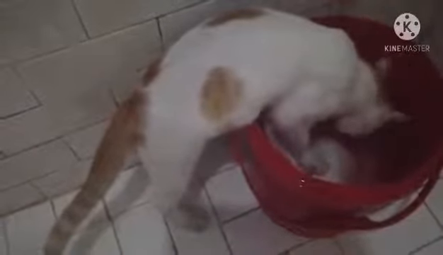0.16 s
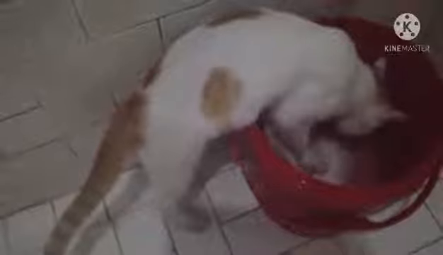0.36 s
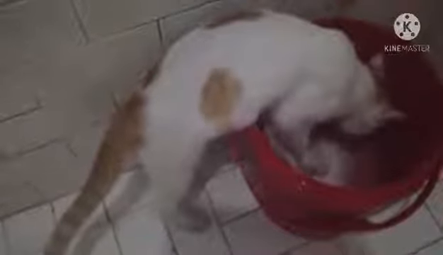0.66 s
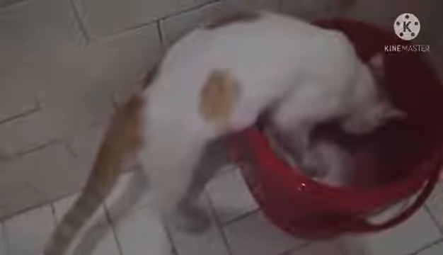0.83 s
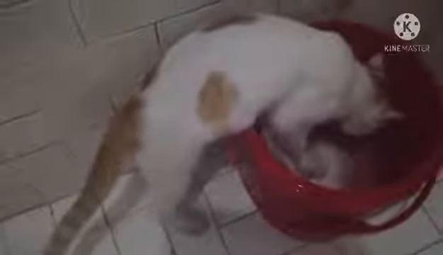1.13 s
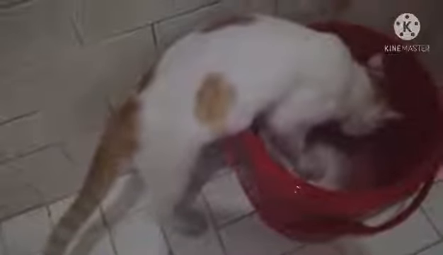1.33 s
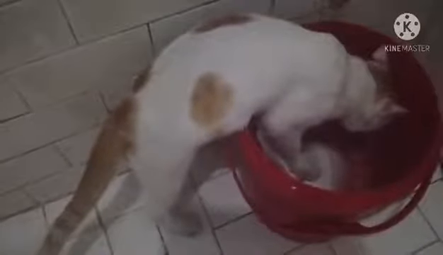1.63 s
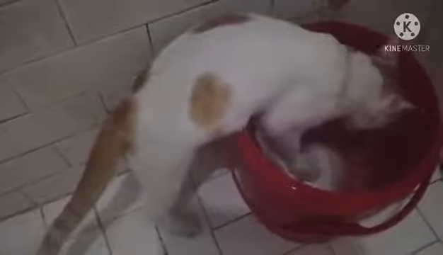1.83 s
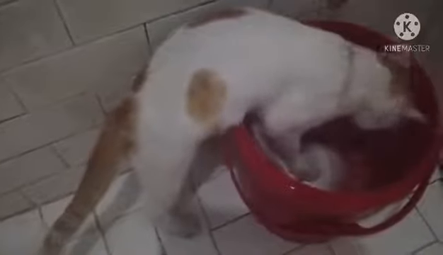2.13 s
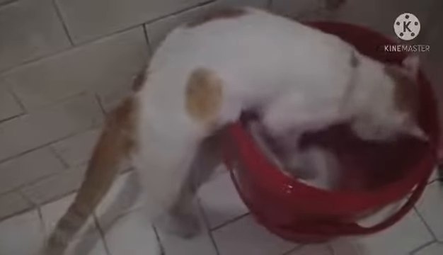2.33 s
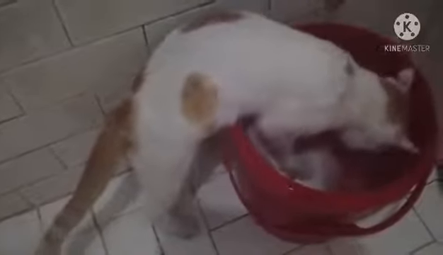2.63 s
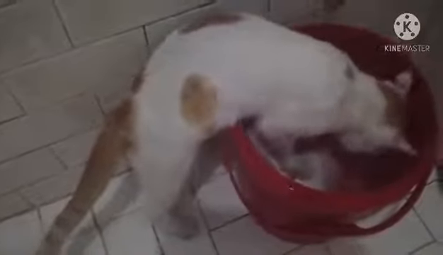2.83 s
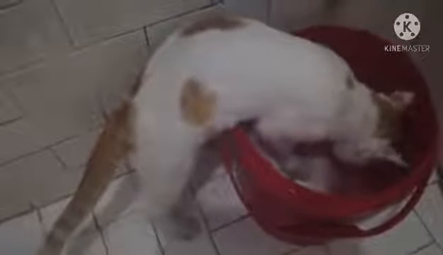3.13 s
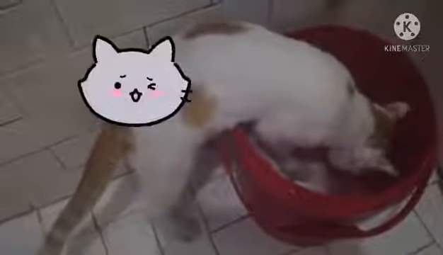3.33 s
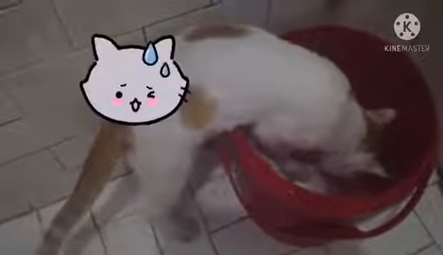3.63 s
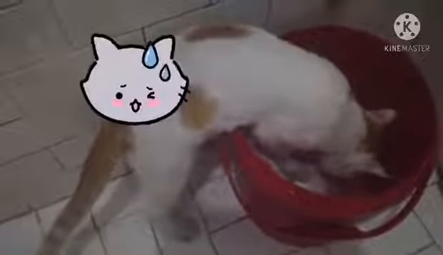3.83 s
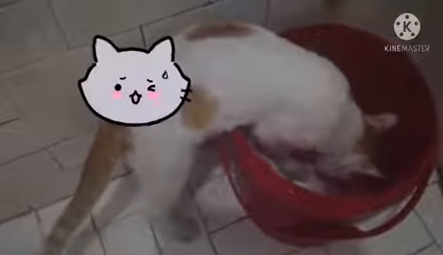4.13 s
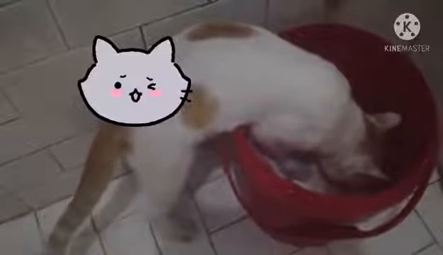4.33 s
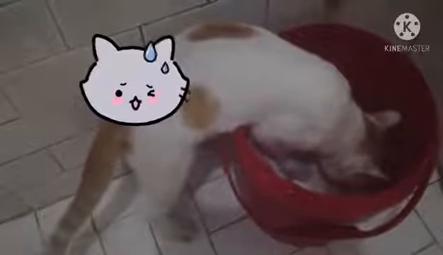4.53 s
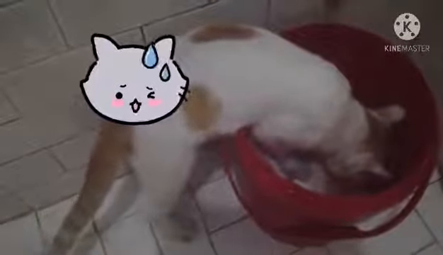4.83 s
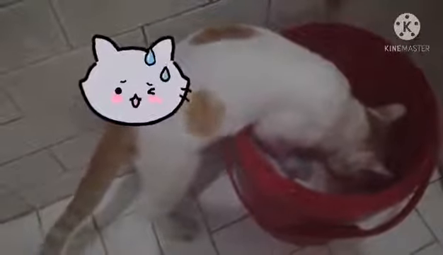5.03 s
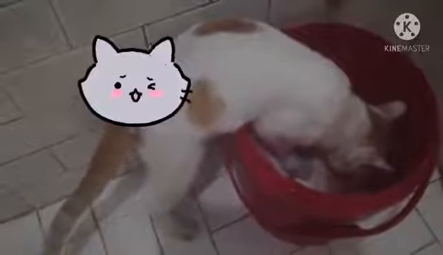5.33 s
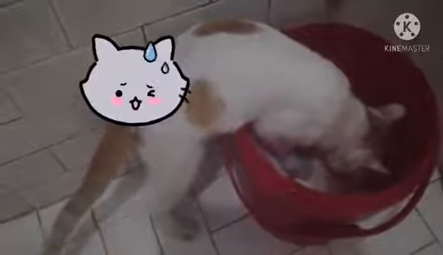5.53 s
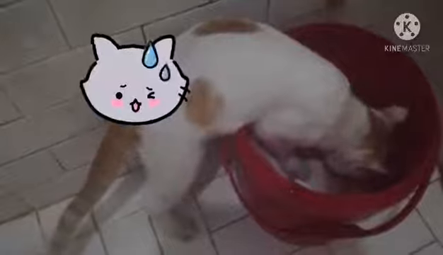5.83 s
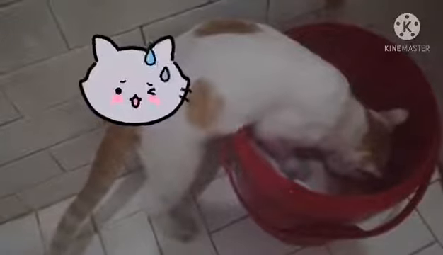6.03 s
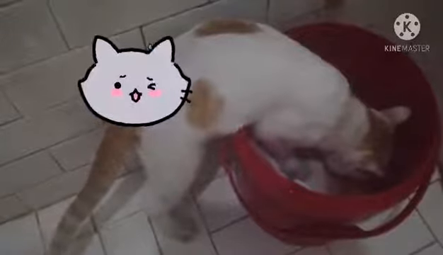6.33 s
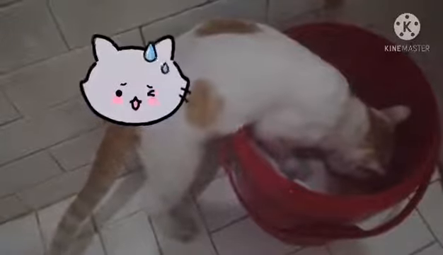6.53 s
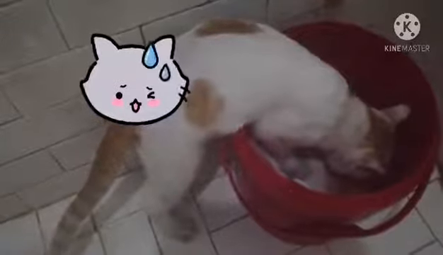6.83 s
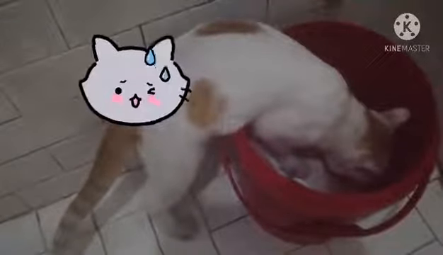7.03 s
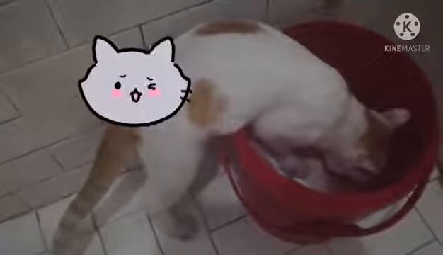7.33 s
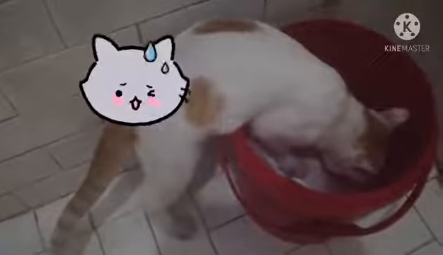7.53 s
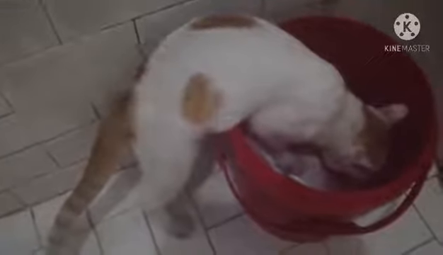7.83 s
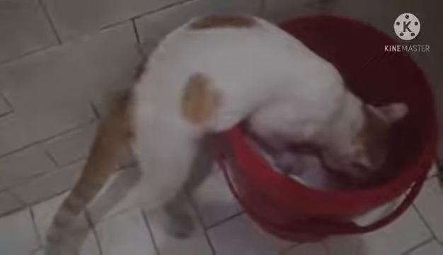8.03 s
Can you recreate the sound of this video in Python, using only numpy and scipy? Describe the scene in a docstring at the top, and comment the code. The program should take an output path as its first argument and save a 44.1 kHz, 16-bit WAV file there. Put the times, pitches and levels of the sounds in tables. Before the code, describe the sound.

Close, wet splashing and bubbling in a plastic bucket, heard twice around a quiet gap with faint distant taps, then near-silent room tone.

```python
"""Water slopping in a bucket

Water slops in a plastic bucket in a tiled room: one bout of wet splashes and bubbles, heard twice with a pause.
In each splash an air pocket plops and a water film snaps. Drops fall back, a wake fizzes and settles,
and bubbles chirp as they surface. Each sound is a short fading tone, a crowd of such tones, or shaped noise.
The very quiet room lies to the right: low rumble, hiss, very narrow bands of noise that slowly swell and fade,
and a few distant taps."""
import sys
import numpy as np
from scipy import signal
from scipy.fft import rfft, irfft, next_fast_len
from scipy.io import wavfile
from scipy.ndimage import uniform_filter1d

SR = 44100
rng = np.random.default_rng(int(sys.argv[2]) if len(sys.argv) > 2 else 0)


def store_pcm(level_fs):
    """Save levels as 16-bit WAV."""
    pcm = np.round(np.clip(level_fs, -1, 1) * 32767).astype(np.int16)
    wavfile.write(sys.argv[1], SR, np.atleast_2d(pcm).T)


N = 360013
TIME = np.arange(N) / SR

# Steady hiss and rumble of the room: [f/Hz, level/dB]
ROOM_SPECTRUM = [(12, -18), (22, 2), (59, -8), (94, -3.5), (115, -15), (158, -12), (195, -20.5), (330, -22),
                 (600, -22.5), (1000, -30), (3000, -37.5), (3900, -48), (5800, -33.5), (10000, -37),
                 (13000, -47.5)]
# Swells of the low rumble: [top t/s, half width/s, level/dB, f/Hz]
RUMBLE_SWELLS = [(2.52, 0.045, -54, 67.4), (2.585, 0.045, -52, 89.6), (2.8, 0.046, -46.5, 71.6),
                 (2.865, 0.043, -50, 87.4), (3.08, 0.066, -56, 96), (7.5, 0.23, -56.5, 89)]
# Very narrow bands of noise that slowly swell and fade: [start t/s, top t/s, end t/s, f/Hz, level at the top/dB]
NARROW_BANDS = [(5.9, 6.24, 6.75, 4140, -75), (6.55, 6.83, 7.35, 9900, -72), (7.36, 7.609, 8.05, 4170, -71)]
# Splashes and drips, each a plop and a snap: [t/s, plop level/dB, plop f/Hz, snap level/dB, snap f/Hz]
SPLASHES = [(3.750, -72, 2000, -44, 6100), (3.763, -57, 1080, -34, 5840), (3.796, -60, 1900, -41, 4440),
            (3.836, -35.5, 897, -43, 5240), (3.865, -38, 925, -25, 4780), (3.873, -34, 932, -26, 5140),
            (3.935, -50, 1080, -35, 3620), (3.96, -41.5, 2060, -37.5, 4700), (4.002, -65, 2100, -40, 8600),
            (4.019, -77, 1440, -46, 3330), (4.046, -29, 1020, -26, 3270), (4.052, -26, 940, -25.5, 6540),
            (4.081, -25.5, 867, -32, 2740), (4.092, -61, 837, -28, 5000), (4.131, -16, 951, -22.5, 4050),
            (4.141, -31, 1020, -29.5, 3450), (4.149, -32, 1055, -33, 3580), (4.157, -30.5, 845, -34, 3945),
            (4.166, -50, 1095, -26, 2760), (4.196, -34, 1000, -36, 4150), (4.245, -37, 956, -33, 7600),
            (4.263, -47, 1130, -38.5, 5485), (4.272, -34.5, 957, -45, 2580), (4.283, -32, 1015, -44, 2770),
            (4.298, -27.5, 1054, -33, 3540), (4.349, -33.5, 1254, -42.5, 4200),
            (4.359, -36.5, 952, -35, 4550), (4.4, -39, 1115, -47, 3500), (4.469, -34, 1000, -37, 3600),
            (4.494, -33, 1080, -28, 5130), (4.505, -29.5, 1095, -21.5, 3560),
            (4.525, -27.5, 944, -21, 4100), (4.568, -31.5, 1054, -96, 3660), (4.58, -31, 867, -72, 3060),
            (4.607, -32.5, 1217, -26.5, 4200), (4.622, -31, 1192, -32, 4070), (4.636, -30, 1158, -24, 4145),
            (4.647, -21.5, 1038, -22.5, 3806), (4.651, -23.5, 961, -23, 3683),
            (4.659, -22.5, 1081, -28.5, 2962), (4.669, -24.5, 1210, -34.5, 3263),
            (4.695, -22.5, 1058, -39, 3534), (4.705, -31, 991, -34.5, 3776),
            (4.726, -33.5, 1079, -28.5, 3576), (4.746, -36.5, 1238, -32.5, 7780),
            (4.789, -20.5, 1388, -17, 4200), (4.797, -21.5, 1237, -7, 5000),
            (4.803, -13.5, 1278, -24.5, 3057), (4.818, -22.5, 1200, -18.5, 4766),
            (4.827, -23, 1349, -29, 3020), (4.850, -24.5, 1270, -17.5, 4200),
            (4.860, -23.5, 1277, -26.5, 4660), (4.865, -24, 1214, -19, 4020), (4.877, -21, 1259, -46, 3164),
            (4.914, -24, 1253, -45, 4580), (4.967, -32, 1035, -21, 5300), (4.986, -34, 1380, -26.5, 5460),
            (4.990, -27, 1660, -28.5, 5250), (5.006, -12.5, 1327, -24, 5400), (5.008, -22, 1006, -15, 6420),
            (5.023, -27.5, 1230, -28.5, 5570), (5.032, -33, 1143, -26.5, 3580),
            (5.039, -29.5, 1390, -26.5, 4720), (5.069, -24.5, 1367, -26.5, 3572),
            (5.087, -42.5, 1458, -31.5, 3060), (5.099, -39, 1420, -36, 4670),
            (5.113, -19.5, 1395, -15, 3950), (5.126, -25, 1410, -16.5, 5575),
            (5.133, -22.5, 1195, -33, 3250), (5.162, -31.5, 1294, -31.5, 3044),
            (5.195, -32, 1227, -28.5, 5720), (5.232, -10, 1580, -13.5, 5795),
            (5.240, -13.5, 1510, -14.5, 5340), (5.250, -15, 1259, -21, 4430),
            (5.266, -25.5, 1289, -33.5, 3850), (5.279, -30, 969, -34.5, 3490),
            (5.293, -25, 1628, -19, 3570), (5.299, -20, 1560, -16.5, 3930), (5.311, -24, 1566, -19.5, 3620),
            (5.322, -19.5, 1372, -26, 3640), (5.352, -18.5, 1735, -21.5, 3520),
            (5.358, -19.5, 1435, -23.5, 5570), (5.382, -44, 1415, -27.5, 6050),
            (5.429, -21.5, 1370, -19.5, 7560), (5.439, -37.5, 1230, -28, 6540),
            (5.456, -27, 1375, -28, 3020), (5.474, -34.5, 1850, -30.5, 2900),
            (5.504, -27.5, 1570, -39, 2940), (5.515, -26.5, 1310, -32, 2860), (5.535, -38, 1430, -38, 3750),
            (5.556, -41, 890, -35, 2860), (5.568, -35, 1480, -37, 4900), (5.594, -31, 1390, -36.5, 3740),
            (5.612, -38.5, 1220, -38, 2950), (5.633, -36.5, 994, -40.5, 5400),
            (5.642, -41, 1510, -39.5, 3140), (5.666, -43, 1240, -41, 5670), (5.676, -34.5, 1320, -40, 3060),
            (5.683, -36, 2280, -39, 6900), (5.721, -54, 1380, -43.5, 5000), (5.743, -39.5, 1020, -41, 2880),
            (5.770, -51, 1460, -47, 3200), (5.804, -34, 1440, -32.5, 6760), (5.827, -46, 1110, -53, 7450),
            (5.835, -30, 1550, -32.5, 3040), (5.844, -34, 1480, -32, 6940), (5.863, -41.5, 1120, -31, 7500),
            (5.871, -28, 1660, -30.5, 6470), (5.898, -39.5, 1200, -39, 2960), (5.921, -40, 1280, -44, 6900),
            (5.944, -44, 1510, -48, 2950), (5.955, -31.5, 1283, -35, 2970), (5.956, -32.5, 1680, -46, 4220),
            (5.975, -49, 1367, -46, 3480), (5.992, -39.5, 1600, -48, 2980), (6.010, -44, 1236, -55, 2960),
            (6.022, -55, 1720, -52, 3760), (6.042, -56, 1530, -51, 3000), (6.076, -38.5, 1647, -30.5, 6700),
            (6.106, -49, 1520, -67, 3470), (6.113, -56.5, 1100, -51, 3300), (6.155, -50, 1570, -67, 5410),
            (6.166, -53, 1135, -70, 5000), (6.177, -49, 1650, -49.5, 8180), (6.182, -45.5, 1186, -75, 4570),
            (6.205, -83, 1150, -47.5, 8700), (6.218, -52, 1185, -58, 3140),
            (6.259, -46.5, 1555, -47.5, 7700), (6.317, -52, 1575, -57, 3410)]
# How much the water is stirred between splashes: [t/s, slosh level/dB, fizz level/dB]
STIRRING = [(3.74, -84, -66), (3.85, -55, -62.5), (4.0, -81, -89), (4.057, -35, -40.5), (4.23, -48.5, -60),
            (4.33, -40, -52), (4.44, -55.5, -58.5), (4.54, -48.5, -59), (4.64, -42, -45),
            (4.77, -52.5, -55.5), (4.83, -40, -56.5), (4.95, -46.5, -51), (5.03, -42.5, -50.5),
            (5.22, -45, -53.5), (5.27, -33, -53.5), (5.45, -41, -50), (5.58, -52, -57.5), (5.68, -44, -66),
            (5.78, -94, -77.5), (6.2, -71, -77.5), (6.42, -80.5, -82.5)]
# Larger pockets that gurgle low while the water is churned hardest: [t/s, level/dB]
GURGLING = [(4.7, -75), (4.8, -47), (4.93, -63), (5.02, -47), (5.2, -58), (5.3, -50.5), (5.45, -49),
            (5.6, -60), (5.75, -85)]
# Tone balance of the fine wet fizz: [f/Hz, level/dB]
FIZZ_SPECTRUM = [(1200, -26.5), (1900, -5), (2600, -8.5), (3300, -2), (4200, -4.5), (5500, 1.5),
                 (7500, 1.5), (10000, 3), (13000, -4.5)]
# Single ringing bubbles: [t/s, length/s, level/dB, first f/Hz, last f/Hz]
BUBBLES = [(3.862, 0.0113, -33, 2940, 4570), (3.934, 0.015, -39, 3480, 3730),
           (4.017, 0.031, -33.5, 3350, 3570), (4.05, .022, -35, 2200, 2550),
           (4.077, 0.0275, -29.5, 2650, 3040), (4.106, 0.018, -26.5, 1014, 1080),
           (4.155, 0.017, -34, 2600, 3650), (4.164, .025, -29, 1110, 1140), (4.195, .016, -36, 3870, 4100),
           (4.256, 0.025, -36, 1240, 1620), (4.285, 0.039, -35, 2655, 2650), (4.334, .024, -38, 1126, 1300),
           (4.366, 0.022, -40, 3870, 4200), (4.401, 0.016, -33, 1155, 1190),
           (4.502, 0.028, -38, 2800, 2940), (4.515, 0.015, -49, 2080, 2560),
           (4.644, 0.03, -29.5, 2306, 2200), (4.646, 0.022, -33, 5130, 5260),
           (4.644, 0.044, -29, 1032, 1100), (4.664, 0.014, -36, 2240, 2530),
           (4.376, 0.035, -40, 2720, 3070), (4.523, 0.019, -39, 3010, 4550), (4.618, .018, -33, 3730, 4130),
           (4.714, 0.022, -36.5, 2490, 4100), (4.755, .04, -42, 721, 669.6), (4.802, .024, -24, 645, 656),
           (4.8272, .04, -25, 646.6, 694), (4.849, 0.04, -25.5, 1333, 1285),
           (4.891, 0.077, -28, 1276, 1347), (4.877, 0.029, -22, 741, 750), (4.903, 0.096, -36.5, 792, 848),
           (4.93, 0.09, -41, 1460, 1610), (4.96, 0.033, -34, 1370, 1500), (4.9715, 0.033, -22, 592, 650),
           (4.988, 0.018, -28, 682, 1000), (5.014, 0.023, -26, 589, 503), (5.031, 0.092, -40, 503, 576),
           (5.037, .075, -26.5, 1418, 1407), (5.061, .04, -28, 1374, 1420), (5.097, 0.053, -43, 1390, 1642),
           (5.072, 0.025, -26, 690, 730), (5.104, 0.11, -38.5, 770, 913), (5.133, 0.06, -25.5, 553, 560),
           (5.135, 0.058, -24.5, 987, 1035), (5.155, 0.087, -41.5, 126.3, 142),
           (5.158, 0.024, -33, 1050, 1537), (5.169, .025, -29, 1599, 1693), (5.174, 0.019, -36, 1732, 3100),
           (5.194, .025, -36, 1670, 1728), (5.195, .03, -33.5, 1035, 1059), (5.25, .014, -27, 4310, 4400),
           (5.237, .014, -15, 5900, 4117), (5.256, 0.017, -27.5, 1180, 1520),
           (5.269, .014, -27, 3880, 3928), (5.293, 0.025, -23, 1559, 1634), (5.33, 0.025, -31, 1430, 1480),
           (5.326, .014, -40, 3620, 3960), (5.224, 0.12, -50.5, 553, 593), (5.243, 0.16, -27.5, 1013, 1045),
           (5.321, 0.05, -35, 738, 765), (5.322, 0.1, -40, 560, 667), (5.378, 0.096, -36.5, 700, 770),
           (5.362, 0.025, -26, 1990, 2060), (5.403, 0.018, -24, 1270, 1600),
           (5.419, 0.013, -29, 1660, 2600), (5.43, 0.03, -31, 820, 860), (5.44, .11, -39.5, 268, 314),
           (5.44, 0.024, -30.5, 2430, 2500), (5.444, 0.014, -29, 950, 1250),
           (5.454, 0.0135, -28.5, 1345, 1850), (5.471, 0.017, -32, 2250, 2320),
           (5.45, 0.067, -32.5, 641, 588), (5.505, 0.025, -30.5, 2760, 2970),
           (5.506, 0.025, -30.5, 1900, 1980), (5.524, 0.019, -33, 3020, 3300),
           (5.529, 0.145, -47.5, 590.6, 762), (5.605, 0.0298, -38, 1107, 1860),
           (5.631, 0.04, -31, 334, 270), (5.643, 0.09, -42, 300, 296), (5.68, 0.015, -41, 1560, 2200),
           (5.692, 0.045, -46.5, 2360, 2560), (5.743, 0.042, -39.5, 1007, 1040),
           (5.839, 0.038, -33, 1533, 1570), (5.863, 0.04, -41, 1547, 1570), (5.875, 0.032, -38, 1156, 1170),
           (5.896, 0.021, -33, 1620, 1640), (5.93, .02, -58, 1280, 1300), (5.952, 0.042, -35, 1233, 1280),
           (5.978, 0.025, -50, 1320, 1750), (6.009, 0.017, -42.5, 1970, 2040),
           (6.076, 0.035, -44.5, 1640, 1650), (6.218, 0.016, -51, 1980, 2020),
           (6.247, 0.022, -53, 1620, 1670)]
# Deep pulses of the water pushed aside: [t/s, length/s, level/dB, last f/Hz]
GULPS = [(3.611, 0.092, -44.5, 38), (3.761, 0.135, -44.5, 25.6), (3.964, 0.171, -40.5, 43),
         (4.325, 0.143, -39.5, 49.7), (4.481, .165, -38, 65.56), (4.672, 0.2, -38.5, 88.6),
         (4.955, .145, -35.5, 84.2)]
# Tones of the air in the bucket: [f/Hz, level/dB]
BUCKET_TONES = [(600, -8.5), (996, -4), (1240, -8.5), (1299, -10), (1440, -10.5), (1560, -6), (1744, -7),
                (1955, -9), (2750, -15), (3650, -15.5), (3900, -10.5)]
# Distant taps: [t/s, level/dB]
TAPS = [(2.454, -46.5), (2.661, -45), (2.824, -54.5), (2.917, -59)]
# Tone balance of the distant taps: [f/Hz, level/dB]
TAP_SPECTRUM = [(200, -20), (330, 4.5), (520, -4), (800, -8), (1200, -3.5), (1800, 0.5), (2400, -7),
                (3000, -9.5), (3800, -25), (7000, -30)]

REPEAT_S = 4.06349   # the bout is also heard this much earlier
CUTOFF_HZ = 13300
SIDE_DB = -6.5
SWELL_WIDTH_HZ = 19
BAND_FADE_DB = 21   # how far below its top each narrow band starts and ends
# ring times down to -60 dB, counted in cycles of the tone
PLOP_CYCLES, SNAP_CYCLES, SPRAY_CYCLES, CHIRP_CYCLES, PLIP_CYCLES = 36.5, 24, 36, 110, 42
# drops thrown up by a splash fall back: mean delay, level against the splash, loss with delay, pitch scatter
FALL_S, FALL_DB, FALL_DB_PER_S, FALL_OCTAVES = 0.02, -12, 91.5, 0.12
FALL_SNAP_DB = -16.5   # a falling drop's snap against that of the splash
FALL_GROWTH, BIG_SPLASH_DB = 0.29, -22   # small splashes throw less: dB lost per dB below a big one
CRACK_DB, CRACK_T60_S = -1, .003   # tick of a tearing film: level against its snap, time to fall 60 dB
# wake of small bubbles: start against the plop and the snap, and how fast it settles
WAKE_SLOSH_DB, WAKE_FIZZ_DB, WAKE_DB_PER_S = -23.0, -29.5, 200.5
PLIPS_PER_S, TRICKLE_PER_S, SPRAY_PER_S = 320, 700, 3200   # small bubbles born each second
SWARM_RISE, CHIRP_RISE = .035, .3   # upward glide as a share of the pitch
BUBBLE_FADE_DB, SURFACING_DB_PER_OCTAVE = 28.5, 30   # a bubble that glides up fades less
BUBBLE_WAVER = 0.0055   # random phase drift: radians per root second, per Hz of pitch
BUBBLE_FLUTTER_DB, BUBBLE_FLUTTER_S = 2, 0.0063   # shaking of level: depth at 1 kHz by the end, time scale
GULP_FIRST_HZ = 22.9
BUCKET_WIDTH_HZ = 22


def from_db(db):
    """Turn decibels into a plain multiplier."""
    return 10 ** (np.asarray(db) / 20)


def rms_one(x):
    """Scale a sound to an average strength (rms) of 1."""
    return x / np.sqrt(np.mean(x ** 2) + 1e-20)


def noise():
    """Plain random hiss for the whole scene."""
    return rng.standard_normal(N)


def in_time(rows):
    """Read each column of a curve table at every sample."""
    s, *columns = np.transpose(rows)
    return [np.interp(TIME, s, c) for c in columns]


def add(out, s, sound):
    """Mix a sound in at time s."""
    i = max(round(s * SR), 0)
    out[i:i + len(sound)] += sound[:N - i]


def band(x, low_hz, high_hz):
    """Keep only the pitches between two limits."""
    sections = signal.butter(2, [low_hz, min(high_hz, .45 * SR)], "band", fs=SR, output="sos")
    return signal.sosfilt(sections, x)


def coloured(x, spectrum):
    """Shape a sound by a spectrum, then set its rms to 1."""
    hz, db = np.transpose(spectrum)
    size = next_fast_len(N)
    bins = np.maximum(np.arange(size // 2 + 1) * SR / size, 1)
    gain = from_db(np.interp(np.log(bins), np.log(hz), db))
    return rms_one(irfft(rfft(x, size) * gain, size)[:N])


def room_tone():
    """Steady hiss, a rumble that swells now and then, and very narrow bands of noise that slowly swell and fade."""
    out = from_db(-55.5) * coloured(noise(), ROOM_SPECTRUM)
    for s, width, db, hz in RUMBLE_SWELLS:
        rumble = rms_one(band(noise(), hz - SWELL_WIDTH_HZ / 2, hz + SWELL_WIDTH_HZ / 2))
        out += from_db(db) * np.exp(-((TIME - s) / width) ** 2) * rumble
    for start, top, end, hz, db in NARROW_BANDS:
        away = np.maximum((top - TIME) / (top - start), (TIME - top) / (end - top))
        narrow = rms_one(band(noise(), hz * .99, hz * 1.01))
        out += from_db(db - BAND_FADE_DB * away) * narrow
    return out


def damped(t, hz, t60, rise, swell_cycles):
    """A pocket of air swells quickly, then rings out while its pitch rises by a share."""
    age = t / np.maximum(t60, .001)
    swell = 1 - np.exp(-t * hz / max(swell_cycles, .01))
    ending = np.minimum(1, 4 * (1 - t / t[-1]))
    phase = 2 * np.pi * hz * t * (1 + rise * np.minimum(age, 1))
    return swell * ending * from_db(-60 * age) * np.sin(phase)


def splashes(db_column, hz_column, cycles, fall_db, count):
    """Rows [t/s, level/dB, f/Hz, t60/s] for each splash and its falling drops, later ones softer on average."""
    rows = []
    for splash, drops in zip(SPLASHES, rng.standard_normal((len(SPLASHES), count, 4))):
        s, db, hz = splash[0], splash[db_column], splash[hz_column]
        rows.append((s, db, hz, cycles / hz))
        thrown_db = db + fall_db - FALL_GROWTH * max(BIG_SPLASH_DB - db, 0)
        for a, b, size, pitch in drops:
            late = FALL_S * np.hypot(a, b) / np.sqrt(np.pi / 2)
            drop_db = thrown_db - FALL_DB_PER_S * late + 4.2 * size
            drop_hz = hz * 2 ** (FALL_OCTAVES * pitch)
            rows.append((s + late, drop_db, drop_hz, cycles / drop_hz))
    return rows


def impacts(table, rise, swell_cycles, drops_db, drops_s, drops_octaves, drops_cycles, count):
    """Each impact rings one pocket, and a few bubbles of nearby pitch ping just after it."""
    out, t = np.zeros(N), TIME[:2400]
    for (s, db, hz, t60), drops in zip(table, rng.standard_normal((len(table), count, 3))):
        add(out, s, from_db(db) * damped(t, hz, t60, rise, swell_cycles))
        for late, pitch, size in drops:
            drop_hz = min(hz * 2 ** (drops_octaves * pitch), 19000)
            ping = damped(t, drop_hz, drops_cycles / drop_hz, rise, swell_cycles)
            ping_db = db + drops_db + 2 * size - 1.3 * abs(late)
            add(out, s + drops_s * abs(late), from_db(ping_db) * ping)
    return out


def plops():
    """Water closes over a pocket of air, which rings like a small drum."""
    table = splashes(db_column=1, hz_column=2, cycles=PLOP_CYCLES, fall_db=FALL_DB, count=1)
    return impacts(table, rise=0.044, swell_cycles=0.38, drops_db=-10.0, drops_s=0.0066,
                   drops_octaves=0.29, drops_cycles=22.0, count=2)


def snapping():
    """A breaking film tears with a tick of noise and pings high and briefly."""
    table = splashes(db_column=3, hz_column=4, cycles=SNAP_CYCLES, fall_db=FALL_SNAP_DB, count=2)
    pings = impacts(table, rise=0.15, swell_cycles=0.13, drops_db=-7.5, drops_s=0.0033,
                    drops_octaves=.6, drops_cycles=34.0, count=4)
    ticks, t = np.zeros(N), TIME[:600]
    for (s, _, _, db, _), tear in zip(SPLASHES, rng.standard_normal((len(SPLASHES), len(t)))):
        add(ticks, s, from_db(db + CRACK_DB - 60 * t / CRACK_T60_S) * tear)
    return from_db(1.0) * band(pings, 2900, 19845) + band(ticks, 2200, 9500)


def stirring():
    """Slosh dB, fizz dB and slosh Hz: steady stir plus wakes; the slosh follows the pitch of the plops."""
    slosh, fizz = from_db(in_time(STIRRING)) ** 2   # powers, so that wakes simply add
    wake = from_db(-WAKE_DB_PER_S * TIME[:SR // 2])
    for s, plop_db, _, snap_db, _ in SPLASHES:
        add(slosh, s, (from_db(plop_db + WAKE_SLOSH_DB) * wake) ** 2)
        add(fizz, s, (from_db(snap_db + WAKE_FIZZ_DB) * wake) ** 2)
    slosh_hz = uniform_filter1d(in_time(SPLASHES)[1], size=4000)
    return 10 * np.log10(slosh), 10 * np.log10(fizz), slosh_hz


def swarm(per_s, centre_hz, spread_octaves, cycles, rise, size_db, even_s, size):
    """Many small bubbles born at random while the water is stirred; their level is evened to about 1."""
    first, last = STIRRING[0][0], STIRRING[-1][0]
    when, strength, pitch, sign = rng.random((int(per_s * (last - first)), 4)).T
    at = ((first + when * (last - first)) * SR).astype(int)
    scatter = (pitch / (1 - pitch)) ** (spread_octaves / 2)
    hz = np.clip(centre_hz[at] * scatter, 600, 13000)[:, None]
    gain = from_db(size_db * np.minimum(-np.log(1 - strength), 4)) * np.sign(sign - .5)
    grains = gain[:, None] * damped(TIME[:size], hz, cycles / hz, rise, swell_cycles=2.1)
    # add every grain into the timeline at its own start
    out = np.bincount((at[:, None] + np.arange(size)).ravel(), grains.ravel(), N)[:N]
    return out / np.sqrt(np.abs(uniform_filter1d(out ** 2, int(even_s * SR))) + 1e-3)


def sloshing(slosh_hz):
    """Stirred water folds in small air pockets that ring near the pitch of the plops."""
    return swarm(1200, 1.07 * slosh_hz, spread_octaves=.15, cycles=26.0, rise=SWARM_RISE,
                 size_db=6.0, even_s=0.062, size=1500)


def gurgling(slosh_hz):
    """Larger pockets of air ring lower and shorter, in cycles, than the slosh."""
    return swarm(250, 0.72 * slosh_hz, spread_octaves=0.35, cycles=18.0, rise=0.079,
                 size_db=4.0, even_s=0.06, size=3000)


def plips(slosh_hz):
    """Scattered small bubbles ring above the slosh."""
    return swarm(PLIPS_PER_S, 1.7 * slosh_hz, spread_octaves=0.21, cycles=PLIP_CYCLES, rise=.08,
                 size_db=4.5, even_s=0.11, size=1500)


def trickle(slosh_hz):
    """A close crowd of small bubbles of like size rings on as a soft trickle."""
    return swarm(TRICKLE_PER_S, 2.9 * slosh_hz, spread_octaves=.3, cycles=42.0, rise=0.075,
                 size_db=7.0, even_s=0.039, size=1200)


def chirps(slosh_hz):
    """Sparse droplets ring long and glide up in pitch through the spray."""
    return swarm(110, 2.7 * slosh_hz, spread_octaves=.36, cycles=CHIRP_CYCLES, rise=CHIRP_RISE,
                 size_db=6.5, even_s=0.1, size=2000)


def spray():
    """Fine wet fizz: the smallest bubbles burst as a dense run of short pings."""
    pings = swarm(SPRAY_PER_S, np.full(N, 4600.), spread_octaves=0.739, cycles=SPRAY_CYCLES,
                  rise=SWARM_RISE, size_db=6.0, even_s=0.057, size=440)
    return coloured(pings, FIZZ_SPECTRUM)


def surfacing(length, first_hz, last_hz, bend):
    """Age 0-1 and phase of a tone that glides from its first to its last pitch, slowly at first."""
    age = np.linspace(0, 1, int(max(length, .005) * SR))
    hz = first_hz * (last_hz / first_hz) ** (age ** bend)
    return age, 2 * np.pi * np.cumsum(hz) / SR


def bubbles():
    """Larger bubbles sing while pitch and strength waver; ripples shake the small, high ones most."""
    out = np.zeros(N)
    draws = rng.standard_normal((len(BUBBLES), 2, SR // 2))
    for (s, length, db, first_hz, last_hz), (steps, ripples) in zip(BUBBLES, draws):
        age, phase = surfacing(min(length, .5), first_hz, last_hz, bend=1.1)
        drift = np.cumsum(steps[:len(age)]) / np.sqrt(SR)
        smooth = uniform_filter1d(uniform_filter1d(ripples, int(BUBBLE_FLUTTER_S * SR)), size=100)
        flutter_db = BUBBLE_FLUTTER_DB * rms_one(smooth)[:len(age)] * np.sqrt(age * first_hz / 1000)
        fade_db = max(BUBBLE_FADE_DB - SURFACING_DB_PER_OCTAVE * np.log2(last_hz / first_hz), 0)
        swell = (1 - np.exp(-phase / 2.5)) * np.minimum(1, 6 * (1 - age))
        level = from_db(db - fade_db * age + flutter_db)
        add(out, s, level * swell * np.sin(phase + BUBBLE_WAVER * first_hz * drift))
    return out


def gulps(soft_hz):
    """Water pushed aside makes a very low swing that sweeps upward."""
    out = np.zeros(N)
    for s, length, db, last_hz in GULPS:
        age, phase = surfacing(length, GULP_FIRST_HZ, last_hz, bend=1.9)
        add(out, s, -from_db(db) * np.cos(phase) * np.minimum(1, 9 * (1 - age)))
    return band(out, 7.1, soft_hz)


def thuds(soft_hz):
    """Each deep pulse starts with a soft knock as the water is pressed down."""
    out, t = np.zeros(N), TIME[:800]
    for s, _, db, _ in GULPS:
        add(out, s, from_db(db) * damped(t, soft_hz, 0.014, 0, swell_cycles=0.023))
    return out


def bucket_air(x):
    """The hollow tones of the air standing in the bucket, each a narrow resonance."""
    r, out = np.exp(-np.pi * BUCKET_WIDTH_HZ / SR), 0
    for hz, db in BUCKET_TONES:
        feedback = [1, -2 * r * np.cos(2 * np.pi * hz / SR), r * r]
        out = out + from_db(db) * signal.lfilter([1, 0, -1], feedback, x + 1e-18)
    return out * (1 - r * r) / 2


def echoing(x, seconds, t60, gap_s):
    """Many random echoes of unit energy that start after a gap and die away."""
    t = TIME[:round(seconds * SR)]
    echoes = rng.standard_normal(len(t)) * from_db(-60 * t / t60) * (t > gap_s)
    return signal.fftconvolve(x, echoes / np.sqrt(np.sum(echoes ** 2)))[:N]


def bucket(x, t60):
    """Sound bounces between the bucket's walls: a short, dense ring."""
    return echoing(x, 0.125, t60, gap_s=.001)


def tiled_room(x, t60):
    """A diffuse tail that starts after the first wall echo."""
    return echoing(x, 0.5, t60, gap_s=.004)


def slopping():
    """Wet splashes and bubbles: plops and slosh in the middle, snaps and finest spray scattered to both sides."""
    slosh_db, fizz_db, slosh_hz = stirring()
    gurgle_db, = in_time(GURGLING)
    pockets = from_db(2.0) * plops() + from_db(slosh_db - 3.0) * sloshing(slosh_hz)
    pockets = band(band(pockets, 670, 16000), 670, 16000)   # small pockets radiate no bass
    # two separate draws, one for the middle and one for the sides
    crackle, side = [snapping() + from_db(fizz_db - 4.0) * spray() for _ in range(2)]
    middle = pockets + crackle + from_db(fizz_db - 8.5) * plips(slosh_hz)
    middle = middle + from_db(fizz_db - 7.0) * (trickle(slosh_hz) + chirps(slosh_hz))
    middle = middle + from_db(gurgle_db) * gurgling(slosh_hz)
    bucket_ring = bucket_air(middle) + from_db(-8.5) * bucket(middle, t60=0.014)
    middle = middle + bucket_ring + from_db(-19.5) * tiled_room(middle, t60=0.083)
    middle = middle + from_db(-1.5) * bubbles()
    middle = middle + from_db(-1.7) * gulps(soft_hz=200.7) + from_db(5.0) * thuds(soft_hz=151.0)
    for stage in range(4):
        side = band(side, 4200, 19000)
    return middle + from_db(SIDE_DB) * side * [[1], [-1]]   # opposite signs left and right


def taps(t60, tail_db):
    """Far taps arrive as the fading ring of the tiled room."""
    envelope, t = np.zeros(N), TIME[:SR // 2]
    for s, db in TAPS:
        add(envelope, s, from_db(db + tail_db - 60 * t / t60))
    return envelope * coloured(noise(), TAP_SPECTRUM)


def scene():
    """The bout and its earlier hearing, which starts partway in, with the room mostly on the right."""
    bout = slopping()
    shift = round(REPEAT_S * SR)
    earlier = np.pad(bout[:, shift:], ((0, 0), (0, shift)))
    room = room_tone() + taps(t60=0.38, tail_db=-4.0)
    return bout + earlier + room * from_db([[-22], [0]])


def record(dry):
    """The top is cut steeply."""
    return signal.sosfilt(signal.ellip(10, .2, 70, CUTOFF_HZ, fs=SR, output="sos"), dry)


dry = scene()
out = record(dry)
store_pcm(out)
```